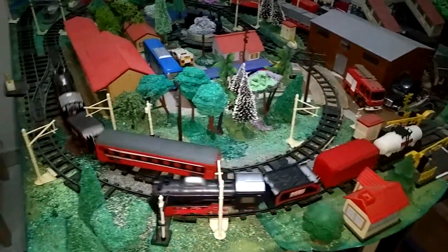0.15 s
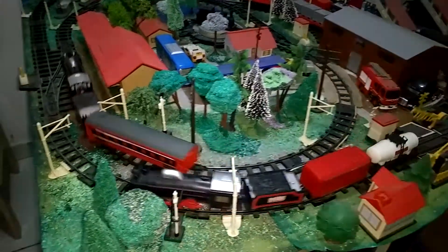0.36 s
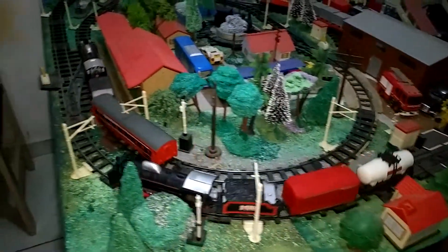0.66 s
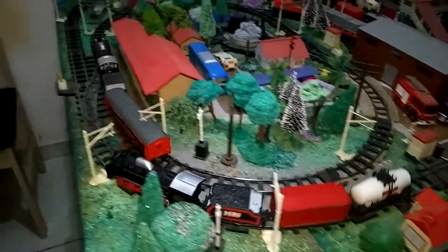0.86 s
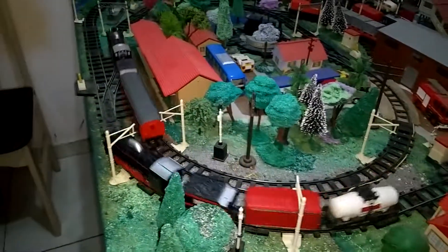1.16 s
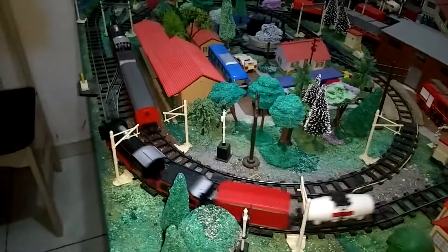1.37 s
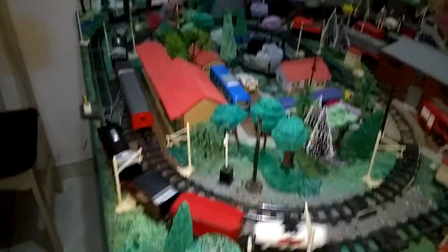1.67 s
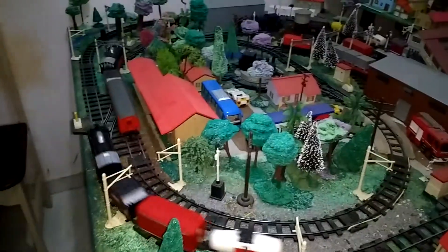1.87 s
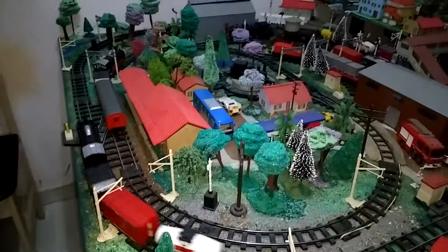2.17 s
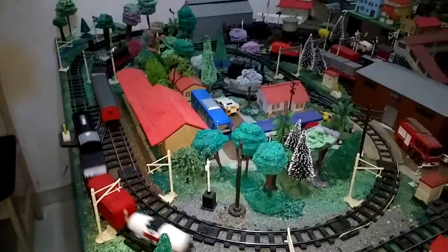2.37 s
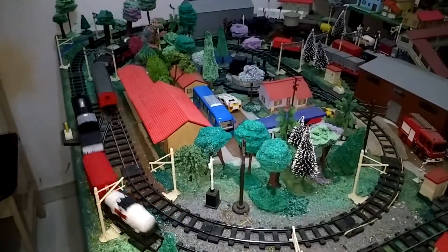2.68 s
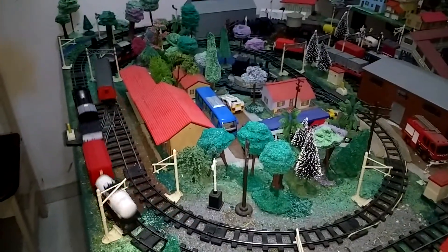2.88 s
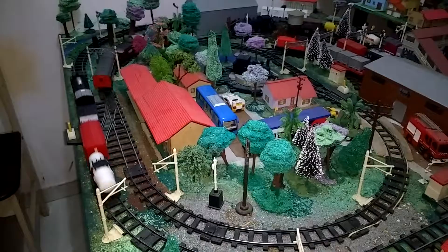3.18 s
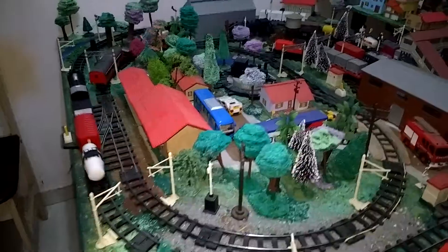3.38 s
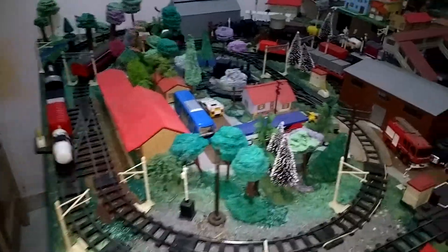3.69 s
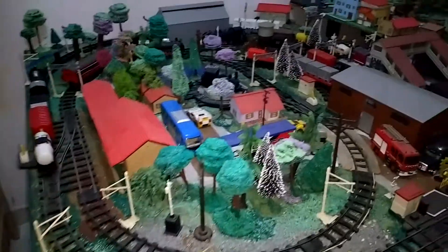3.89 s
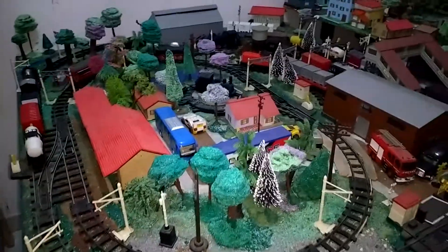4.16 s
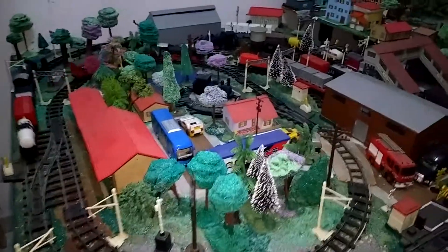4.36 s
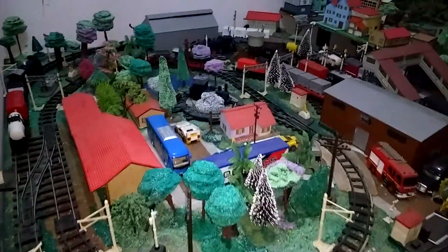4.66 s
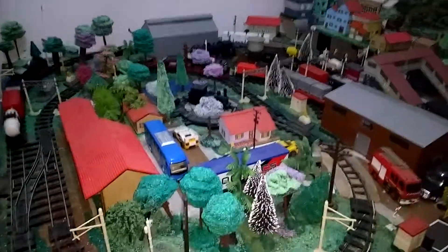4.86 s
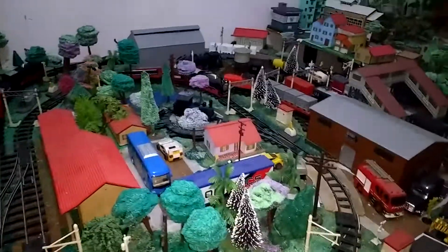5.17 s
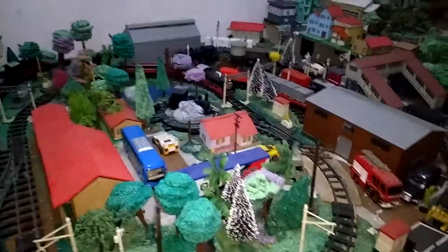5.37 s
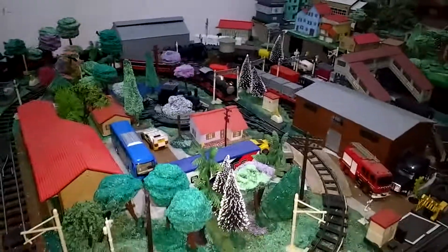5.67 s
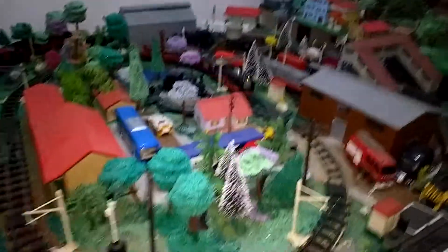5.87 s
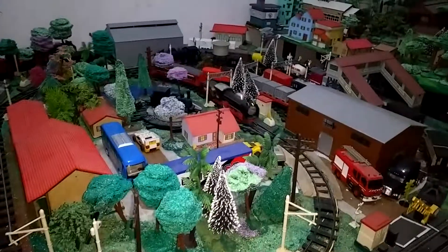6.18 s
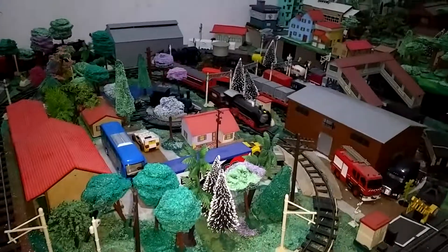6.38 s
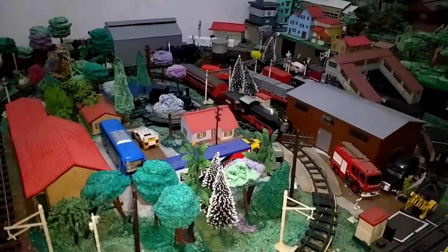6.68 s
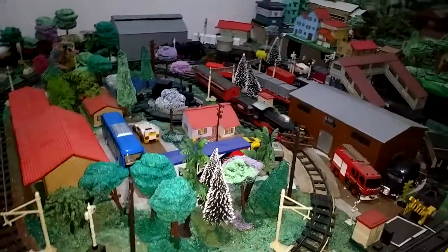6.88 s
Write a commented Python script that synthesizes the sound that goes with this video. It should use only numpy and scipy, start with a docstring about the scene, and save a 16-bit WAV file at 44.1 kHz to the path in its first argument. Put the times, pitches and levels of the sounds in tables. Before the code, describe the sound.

Toy trains whir and rattle steadily around a tabletop track, with hollow knocks and bumps on the handheld microphone growing frequent after two seconds.

```python
"""Toy trains on a tabletop

Electric toy trains circle a layout in a room, heard by a hand-held phone with two microphone ports.
Gear teeth and wheels tick densely into resonant plastic shells, and wavering tones hum from two motors.
Filtered noise and ticks make the hand rub and creak; decaying modes make its knocks and finger taps.
The phone steers its two ports into left and right, and its gain control ducks when the level is too high."""
import sys
import numpy as np
from scipy import signal
from scipy.fft import rfft, irfft
from scipy.io import wavfile
from scipy.ndimage import uniform_filter1d

SR = 44100
rng = np.random.default_rng(int(sys.argv[2]) if len(sys.argv) > 2 else 0)


def store_wav(level_fs):
    """Save 16-bit WAV to argv[1]."""
    pcm = np.round(np.clip(np.atleast_2d(level_fs), -1, 1) * 32767)
    wavfile.write(sys.argv[1], SR, pcm.T.astype(np.int16))


def natural_amplitude(level_db):
    """Convert a level in decibels to a linear amplitude factor, elementwise."""
    exponent = np.asarray(level_db, float) / 20
    return 10 ** exponent


N = 310464
T = np.arange(N) / SR
HZ = np.maximum(np.fft.rfftfreq(N, 1 / SR), 1)


def over_hz(points):
    """A table read along a log-frequency axis."""
    hz, value = np.transpose(points)
    return np.interp(np.log(HZ), np.log(hz), value)


def over_time(rows):
    """The columns of a table, one value a sample."""
    start_s, *columns = np.transpose(rows)
    return [np.interp(T, start_s, column) for column in columns]


def unit(x):
    """Scaled to rms 1."""
    return x / np.sqrt(np.mean(x ** 2))


def shape(x, gain):
    """Filter by a gain per frequency."""
    return irfft(rfft(x) * gain, N)


def peak(hz, width_hz):
    """A resonance, gain 1 at its centre."""
    return 1 / (1 + 1j * (HZ ** 2 - hz ** 2) / (HZ * width_hz))


def walk(rate):
    """Random levels held 1 / rate s and slewed twice; rms 1."""
    hold = int(SR / rate)
    levels = np.repeat(rng.standard_normal(N // hold + 1), hold)
    return unit(uniform_filter1d(uniform_filter1d(levels, hold), hold)[:N])


def grains(rate, spread_db):
    """Random ticks, rate of them a second on average, a few of them larger."""
    size = np.minimum(rng.exponential(size=N), 4)
    struck = rng.random(N) < rate / SR
    return unit(struck * rng.standard_normal(N) * natural_amplitude(spread_db * size))


def moving_room(x, t60_s, wet_db):
    """Direct sound plus fading echoes whose pattern is renewed as the trains move on."""
    renew_s = 0.5
    hop = int(renew_s * SR)
    t = np.arange(4096) / SR
    out = np.zeros(N + 4 * hop + 4096)
    padded = np.pad(x, (hop, 2 * hop))
    fade = np.sqrt(np.hanning(2 * hop))  # each pattern fades into the next
    for i in range(0, N + hop, hop):
        echoes = rng.standard_normal(4096) * np.exp(-np.log(1000) * t / t60_s)
        echoes = echoes / np.linalg.norm(echoes)
        out[i:i + 2 * hop + 4095] += signal.fftconvolve(padded[i:i + 2 * hop] * fade, echoes)
    return x + natural_amplitude(wet_db) * out[hop:hop + N]


def ticks_in_room():
    """Spectrum of tooth and wheel ticks over rolling hiss, with the echoes of the room."""
    rolling = 0.58 * grains(3000, 3.05) + rng.standard_normal(N)
    return rfft(moving_room(rolling, 0.13, -7))


# Colour of the rattle at the near microphone port: pitch_hz [Hz], level_db [dB per Hz]
NEAR_COLOUR = [(50, -26), (100, -15), (140, -8), (200, -5), (400, -14), (800, -12), (1400, -7),
               (2000, -3.5), (3000, 0), (4400, -3.5), (6000, -1), (7500, -8.5), (9000, -12), (11000, -30),
               (14000, -44), (16000, -50)]
# Colour of the rattle at the far microphone port: pitch_hz [Hz], level_db [dB per Hz]
FAR_COLOUR = [(50, -7), (100, -4), (140, -4.5), (200, -3.5), (400, -13.5), (800, -7), (1200, -3.5),
              (2100, -5), (3200, -2), (5000, -3.5), (6500, 2), (8200, -8.5), (10000, -9), (12600, -10),
              (13400, -7), (16000, -12.5)]
# Resonances of the plastic shells: pitch_hz [Hz], width_hz [Hz], far_port_db [dB], near_port_db [dB]
SHELL_RESONANCES = [(1732, 357, 9.5, 6.5), (4370, 900, 7.5, 3.4), (5950, 170, 1.5, 1.5),
                    (9020, 1130, 4.5, -0.3)]
# Part of the rattle that both ports hear alike: pitch_hz [Hz], share [0-1]
SHARED_RATTLE = [(100, 1), (900, 0.93), (1800, 0.5), (3000, 0), (4400, 0.36), (8000, 0.07), (16000, 0.1)]


def rattle_at_ports():
    """Ticks ring the shells; each port hears a shared part and, at equal total power, a part of its own."""
    both, near, far = ticks_in_room(), ticks_in_room(), ticks_in_room()
    alike = np.clip(over_hz(SHARED_RATTLE), 0, 1)
    own = np.sqrt(1 - alike ** 2)
    shared = both * alike
    far_delay_s = 0.00012  # the shared sound reaches the far port a little later
    late = np.exp(-2j * np.pi * HZ * far_delay_s)
    shell = 1
    for hz, width_hz, far_db, near_db in SHELL_RESONANCES:
        shell = shell + (natural_amplitude([[near_db], [far_db]]) - 1) * abs(peak(hz, width_hz)) ** 2
    at_near = (shared + near * own) * natural_amplitude(over_hz(NEAR_COLOUR))
    at_far = (shared * late + far * own) * natural_amplitude(over_hz(FAR_COLOUR))
    return shell * np.array([at_near, at_far])


# Gearbox ring, strongest while an engine passes in front: start_s [s],
# gearbox_db [dB relative to the train level, 7.5 dB above the level played]
GEARBOX_RING = [(0, -9), (.5, 0), (1.2, 2.5), (1.85, -1), (2.05, -7), (2.3, -1), (3.25, -2), (3.5, -7),
                (4.6, -10), (7.04, -14)]


def gearbox_and_engine():
    """Ticks excite a gearbox ring and, around the closest pass, the shell of the engine."""
    gearbox_hz, gearbox_width_hz, flicker_db = 2420, 420, 1.2
    engine_hz, engine_width_hz, engine_db = 1138, 264, -13.5
    pass_s, pass_span_s = 1.62, 1
    gear = ticks_in_room()
    gearbox_db = over_time(GEARBOX_RING)[0] + flicker_db * walk(23)
    whine = unit(irfft(gear * peak(gearbox_hz, gearbox_width_hz) ** 2, N)) * natural_amplitude(gearbox_db - 7.5)
    engine = unit(irfft(gear * peak(engine_hz, engine_width_hz) ** 2, N)) * natural_amplitude(engine_db)
    engine = engine / (1 + ((T - pass_s) / pass_span_s) ** 2)
    # the far port's share of the ring wavers slowly at random
    far_share = -0.2 + 0.2 * walk(4)
    return np.array([whine + engine, 0.39 * engine + far_share * whine])


# Level of the train rattle over time, including a sudden duck after the knock near 4.55 s:
# start_s [s], rattle_db [dB, 3 dB under the rattle gain played],
# body_db [dB, low rumble relative to the rattle; -6.5 leaves the port colours as they are]
RATTLE_LEVEL = [(0, -24, -4), (.1, -25, -5), (.27, -26.5, -6), (.38, -23.5, -5), (.85, -24.5, -4.5),
                (1.1, -24, -4), (1.4, -22, -6.5), (1.9, -24, -5.5), (2.15, -23, -5.5), (2.65, -22.5, -6),
                (2.76, -23, -6.5), (3.05, -24, -7), (3.2, -20.5, -7.5), (3.35, -24, -7),
                (3.95, -23.5, -6.5), (4.1, -21.5, -6.5), (4.3, -23.5, -5.5), (4.55, -21, -3),
                (4.59, -28, -2), (4.85, -24, -4.5), (5.2, -25, -6), (5.5, -27, -3), (5.8, -25.5, -4.5),
                (6.1, -26.5, -4.5), (6.48, -29, -3), (6.62, -25, -2), (6.8, -26, -2), (6.95, -26.5, -3),
                (7.04, -23.5, -2)]
# Depth of the wheel throb: start_s [s], depth_db [dB]
WHEEL_THROB = [(0, 0.1), (2.8, 0.64), (7.04, .7)]


def trains():
    """Rattle, body rumble and rings swell together with the lurching cars and turning wheels."""
    wheel_hz, body_top_hz, body_usual_db = 11.3, 2450, -6.5
    lurch_db, lurch_per_s = 0.54, 10
    rattle_db, body_db = over_time(RATTLE_LEVEL)
    rattle_db = rattle_db + lurch_db * walk(lurch_per_s)
    # uneven wheels throb once a turn; cars shake in bursts
    turn = 2 * np.pi * np.cumsum(wheel_hz * (1 + 0.019 * walk(2.31))) / SR
    shake_db = 0.79 * walk(40) + 0.99 * walk(150)
    throb_db = over_time(WHEEL_THROB)[0] * np.sin(turn) + shake_db
    ports = rattle_at_ports()
    low = 1 / (1 + (HZ / body_top_hz) ** 8)
    body = irfft(ports * low, N) * natural_amplitude(body_db - body_usual_db + 0.6 * walk(24.97))
    hiss = irfft(ports * (1 - low), N)
    return (natural_amplitude(3.0) * (body + hiss) + gearbox_and_engine()) * natural_amplitude(rattle_db + throb_db)


# Effort of the hand holding the phone: start_s [s], rumble_db [dB, 1 dB under the level played]
GRIP_EFFORT = [(0, -78), (.45, -71), (.72, -54), (1.5, -61), (2.3, -51.5), (2.7, -46.5), (3.2, -43.5),
               (3.55, -41), (3.9, -41.5), (4.3, -49.5), (4.5, -44), (5.35, -43.5), (5.5, -39), (5.9, -42.5),
               (6.15, -52.5), (6.75, -50), (6.9, -40), (7.04, -52)]


def grip():
    """The hand rubs the casing by each port on its own; past a certain grip, creak outgrows rumble."""
    creak_db = np.array([[-49.0], [-50.5]])  # near and far port, at creak_at_grip_db
    creak_at_grip_db, creak_slope, creak_patchy_db = -47, 1.7, 1.5
    grip_db = over_time(GRIP_EFFORT)[0]
    rub = peak(93, 67) ** 2 + peak(183, 170) ** 2
    rumble = np.array([unit(shape(rng.standard_normal(N), rub)) for _ in range(2)])
    rumble = rumble * natural_amplitude(grip_db + 1.0 + 1.7 * walk(25) + 3.3 * walk(7))
    creak = np.array([unit(shape(grains(400, 1.6), peak(564, 1060) ** 2)) for _ in range(2)])
    growth_db = creak_slope * (grip_db - creak_at_grip_db) + creak_patchy_db * walk(6.83)
    return rumble + creak * natural_amplitude(creak_db + growth_db)


def hum(hz, waver_hz, db):
    """A motor tone that wavers in pitch and flutters in level."""
    phase = 2 * np.pi * np.cumsum(hz + waver_hz * walk(12)) / SR
    return np.sin(phase) * natural_amplitude(db + 0.8 * walk(9) + 3.2 * walk(24))


# Hum of the near motor: start_s [s], level_db [dB, 11.6 dB under the level played]
NEAR_MOTOR = [(0, -60), (.5, -62), (1.0, -56), (1.3, -52), (1.58, -60), (2.05, -59), (2.2, -55),
              (2.45, -57), (2.6, -51), (3.1, -47.5), (3.45, -49), (3.62, -56), (3.71, -44), (3.78, -56),
              (3.9, -44), (4.1, -45.5), (4.3, -62), (4.45, -40), (4.57, -43), (4.75, -53), (5.3, -52),
              (5.7, -45.5), (6.2, -55), (6.75, -57), (7.04, -53)]
# Hum of a second motor drawing away: start_s [s], level_db [dB]
FAR_MOTOR = [(0, -52.5), (.75, -51), (1.2, -60), (1.6, -67), (7.04, -66)]


def motors():
    """Two motor tones reach both ports through the table, a little weaker at the far one."""
    near_motor = hum(131.7, 2.17, over_time(NEAR_MOTOR)[0] + 11.6)
    far_motor = hum(239.6, 0.72, over_time(FAR_MOTOR)[0])
    return (near_motor + far_motor) * np.array([[1], [0.9]])


def ring(modes, times, dbs, rise_s, scatter):
    """Every blow rings the same modes, slightly detuned by where it lands."""
    out = np.zeros(N + 8192)
    t = np.arange(8192) / SR
    hz, db, t60_s = np.transpose(modes)[:, :, None]
    tunes = rng.standard_normal((len(times), len(modes), 1))
    for start_s, blow_db, tune in zip(times, dbs, tunes):
        tone = np.sin(2 * np.pi * hz * np.exp(scatter * tune) * t)
        wave = natural_amplitude(db) * tone * np.exp(-np.log(1000) * t / t60_s)
        start = int(start_s * SR)
        out[start:start + 8192] += natural_amplitude(blow_db) * wave.sum(0) * (1 - np.exp(-t / rise_s))
    return out[:N]


def room(t60_s, wet_db):
    """Direct sound plus a fading spray of echoes, as a gain per frequency."""
    t = np.arange(8192) / SR
    echoes = rng.standard_normal(8192) * np.exp(-np.log(1000) * t / t60_s)
    return 1 + natural_amplitude(wet_db) * rfft(echoes / np.linalg.norm(echoes), N)


# Knocks on the phone: start_s [s], thump_db [dB], casing_db [dB], clack_db [dB, airborne]
KNOCK_BLOWS = [(0.736, -30, -27, -33), (1.659, -25, -20, -23), (1.92, -18, -19, -22),
               (2.325, -15, -13, -15), (2.497, -17.5, -17, -34), (2.551, -21, -12.5, -9.5),
               (2.565, -20, -20, -27), (2.655, -17, -12, -12), (2.717, -17, -18, -37),
               (3.18, -38, -24, -23), (3.464, -21, -17.5, -35), (3.617, -23, -23, -28),
               (3.637, -27, -21, -33), (3.694, -20, -18, -22), (3.831, -24, -22, -31),
               (3.954, -25, -23, -34), (4.242, -24, -22, -26), (4.336, -38, -23, -32),
               (4.479, -19, -20, -14), (4.538, -22, -26, -23), (4.554, -12, -11.5, -13.5),
               (4.572, -25, -27, -27), (4.629, -19, -20, -31), (4.652, -21, -24, -22),
               (4.804, -35, -19.5, -12), (4.9072, -5, 6, -19), (5.108, -17, -14.5, -27),
               (5.246, -12.5, -19, -15), (5.365, -16, -25, -33), (5.405, -20, -24, -34),
               (5.447, -22, -21, -15), (5.719, -16, -11.5, -7), (5.904, -22, -32, -38),
               (5.975, -26, -23, -24), (6.340, -20, -18.5, -8), (6.704, -12, -16.5, -1.5),
               (6.892, -25, -29, -21)]
# Low thump of a blow, before detuning: pitch_hz [Hz], level_db [dB], t60_s [s]
THUMP_MODES = [(74, -10, 0.12), (130, -2, 0.084), (201, 2.5, 0.051)]
# Ring of the casing, before detuning: pitch_hz [Hz], level_db [dB], t60_s [s]
CASING_MODES = [(331, -2, 0.038), (552, 0, 0.018), (757, -2, 0.016)]
# Bright crack of the casing, before detuning: pitch_hz [Hz], level_db [dB], t60_s [s]
CRACK_MODES = [(1610, -0.5, 0.0039), (2320, 1, 0.0055), (3270, -3, 0.0044)]
# Clack through the air, before detuning: pitch_hz [Hz], level_db [dB], t60_s [s]
CLACK_MODES = [(630, -2, 0.0051), (832, 2, 0.0079), (1120, -2, 0.0046), (1430, -5.5, 0.0036),
               (1770, -6, 0.0045), (2300, -13, .0035), (3570, -11, .003)]


def knocks():
    """Thump, casing and crack reach the near port, airborne clack both; surfaces smear all but crack."""
    start_s, thump_db, casing_db, clack_db = np.transpose(KNOCK_BLOWS)
    casing = ring(THUMP_MODES, start_s, thump_db, 0.0019, 0.11)
    casing = casing + ring(CASING_MODES, start_s, casing_db, 0.00058, 0.14)
    # harder blows crack much brighter
    crack = ring(CRACK_MODES, start_s, 2.42 * casing_db + 6.5, 0.00034, 0.032)
    clack = ring(CLACK_MODES, start_s, clack_db, 0.00075, 0.16)
    table = room(0.026, -6)
    return np.array([shape(casing - clack, table) - crack, -0.8 * shape(clack, table)])


def taps():
    """Light finger touches at random moments ring the casing by the near port, firmer in a tight grip."""
    count, above_grip_db, spread_db = 12, 10, 3.5
    start_s = rng.random(count) * T[-1]
    grip_db = np.interp(start_s, *np.transpose(GRIP_EFFORT))
    tap_db = grip_db + above_grip_db + spread_db * rng.standard_normal(count)
    thump = ring(THUMP_MODES, start_s, tap_db, 0.0021, 0.17)
    casing = ring(CASING_MODES, start_s, tap_db, 0.0009, 0.14)
    return np.array([thump + casing, np.zeros(N)])


def scene():
    """Everything on and around the table, as it reaches the near and the far port."""
    return trains() + grip() + motors() + knocks() + taps()


# Far port taken into the left output, late and inverted: pitch_hz [Hz], level_db [dB]
FAR_INTO_LEFT = [(100, -2), (1200, -1.5), (2500, -2.5), (5000, -11.5), (8500, -6.5), (10500, -21),
                 (12500, -25), (14000, -37), (15500, -37)]
# Near port taken into the right output, late and inverted: pitch_hz [Hz], level_db [dB]
NEAR_INTO_RIGHT = [(100, 0.7), (1200, 2), (2500, 1.47), (5000, -5.5), (8500, -16), (16000, -12)]


def steer(near, far):
    """Each output is one port minus the other a moment late, which favours one direction."""
    delay_s = 18 / SR
    late = np.exp(-2j * np.pi * HZ * delay_s)
    left = near - shape(far, late * natural_amplitude(over_hz(FAR_INTO_LEFT)))
    right = far - shape(near, late * natural_amplitude(over_hz(NEAR_INTO_RIGHT)))
    return np.array([left, right])


def gain_control(x, ceiling_db=-7.5, release_db_per_s=13.0, attack_s=0.0012):
    """Gain falls within milliseconds when the louder side passes the ceiling, then climbs steadily in dB."""
    level = np.sqrt(uniform_filter1d(x ** 2, size=48).max(0) + 1e-12)  # over about a millisecond
    headroom_db = ceiling_db - 20 * np.log10(level)
    climb_db = release_db_per_s * T
    gain_db = np.minimum(np.minimum.accumulate(headroom_db - climb_db) + climb_db, 0)
    keep = np.exp(-1 / (attack_s * SR))
    return natural_amplitude(signal.lfilter([1 - keep], [1, -keep], gain_db))


def band_limit(x):
    """A steep low-pass at the top of the band."""
    return signal.sosfilt(signal.butter(12, 16590, fs=SR, output="sos"), x)


def record(dry):
    """The phone steers its ports, cuts the bass, controls gain, clips and cuts the top."""
    bass_cut_hz, top_hz = 43, 15750
    near, far = dry
    mix = steer(near, far)
    mix = signal.sosfilt(signal.butter(2, bass_cut_hz, "high", fs=SR, output="sos"), mix)
    mix = np.clip(mix * gain_control(mix), -0.95, 0.95)
    mix = signal.sosfilt(signal.ellip(10, 0.2, 60, top_hz, fs=SR, output="sos"), mix)
    return band_limit(mix)


dry = scene()
out = record(dry)
store_wav(out)
```